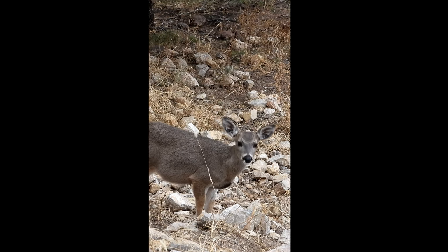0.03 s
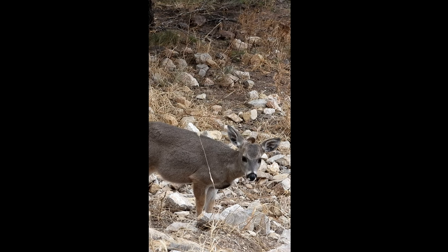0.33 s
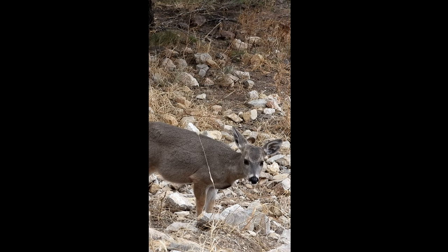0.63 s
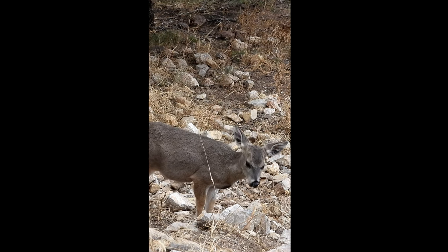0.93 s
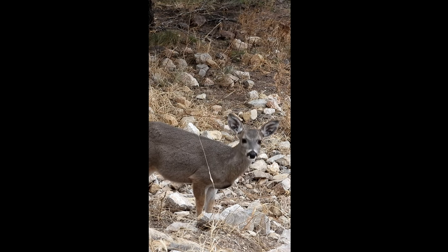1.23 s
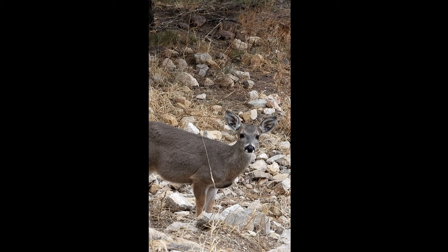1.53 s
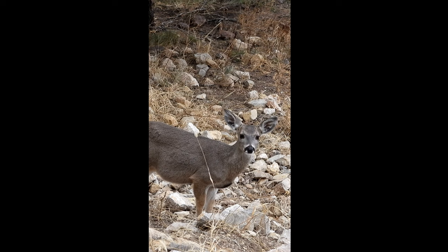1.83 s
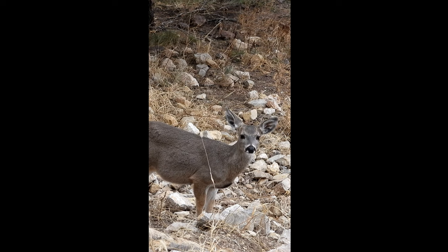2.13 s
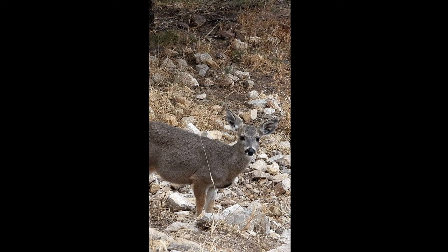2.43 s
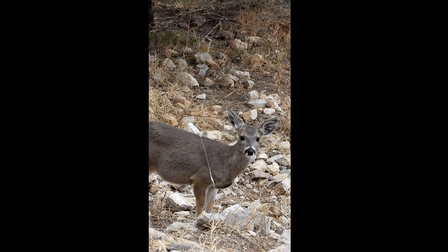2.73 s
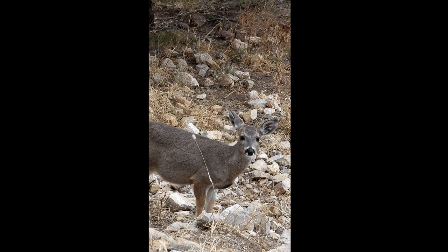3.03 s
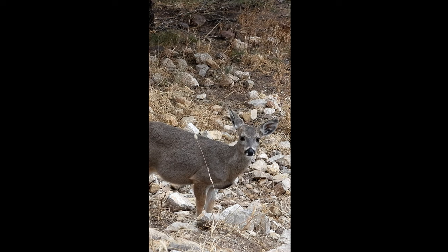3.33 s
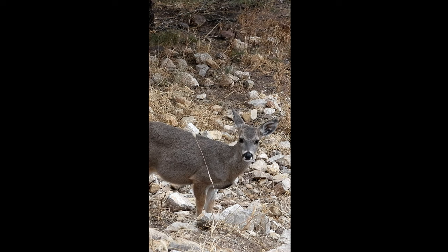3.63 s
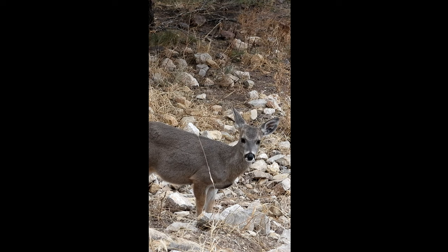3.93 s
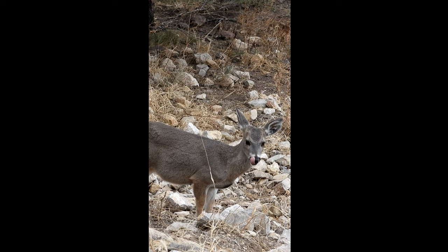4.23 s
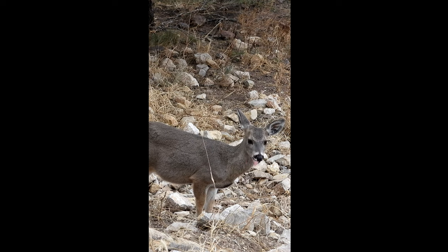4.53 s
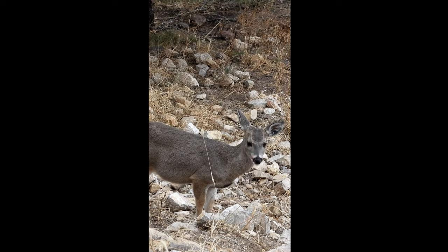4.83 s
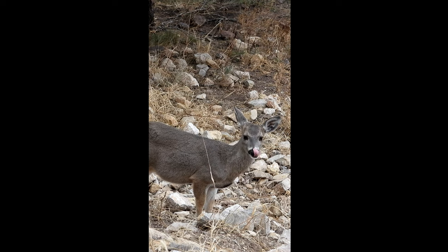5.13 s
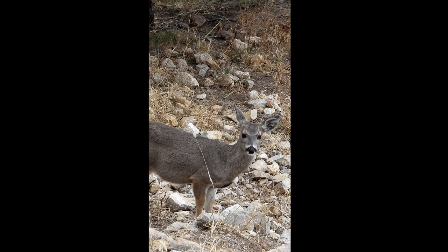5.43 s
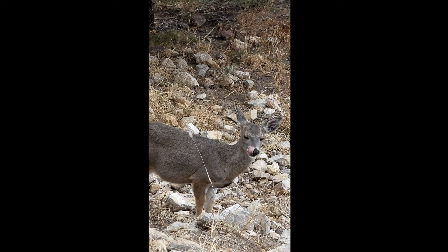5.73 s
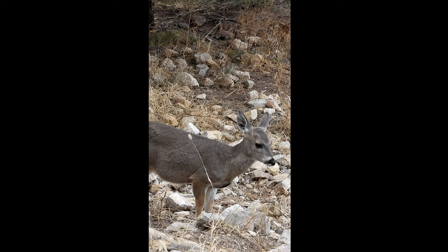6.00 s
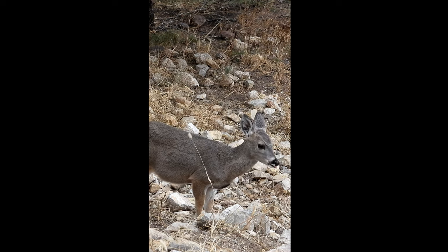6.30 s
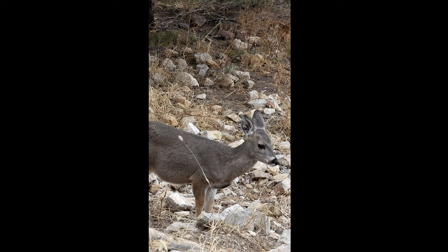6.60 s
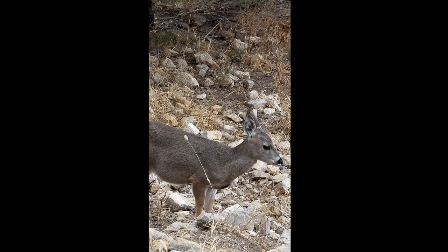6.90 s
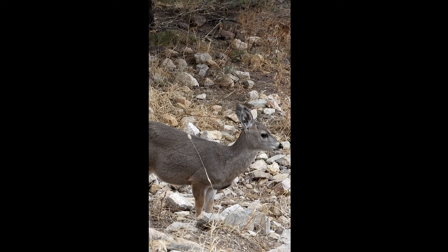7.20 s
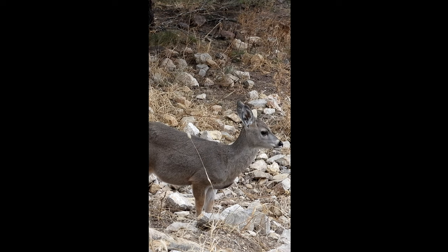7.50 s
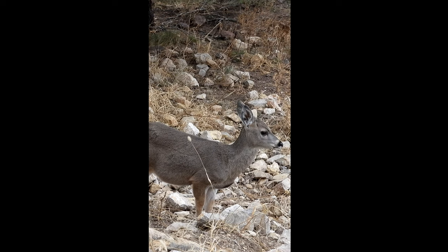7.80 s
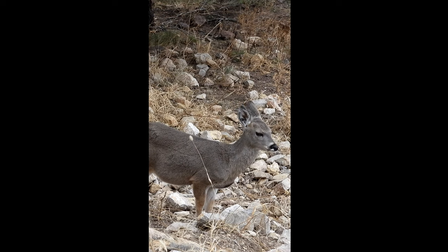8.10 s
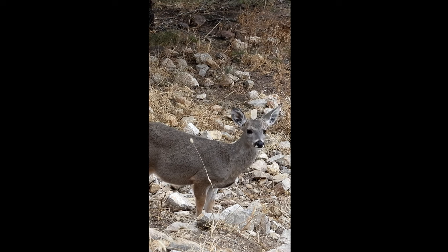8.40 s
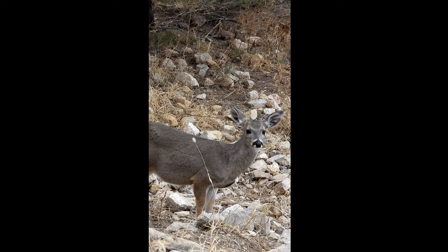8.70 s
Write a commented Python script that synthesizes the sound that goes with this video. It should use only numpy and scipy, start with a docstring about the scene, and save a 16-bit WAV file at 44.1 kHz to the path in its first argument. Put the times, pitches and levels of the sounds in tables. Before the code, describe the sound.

Steady wind rushes outdoors as a deer snorts once, loud and sudden, followed by faint handling thuds and tiny watery blips.

```python
"""Wind rushes steadily through dry brush on a stony slope, a faint thin whine and a few watery blips in it.
About a second in, a deer almost straight ahead of the stereo microphone sneezes: its nostrils splutter
open, a jet hisses through the nose and sinks into a hollower huff, and the rocks scatter it back.
The hand-held camera is bumped softly now and then, a twig ticks, and near the end comes a double sniff."""
import sys
import numpy as np
from scipy import signal
from scipy.fft import rfft, irfft
from scipy.io import wavfile

SR = 44100
rng = np.random.default_rng(int(sys.argv[2]) if len(sys.argv) > 2 else 0)


def transcribe(signal):
    """Save signal, clipped to [-1, 1], as a 16-bit WAV file at the path in sys.argv[1]."""
    frames = np.atleast_2d(signal).T
    limited = np.clip(frames, -1, 1)
    pcm = np.round(limited * 32767).astype(np.int16)
    wavfile.write(sys.argv[1], SR, pcm)


N = 394694
TIME = np.arange(N) / SR
BIN_HZ = np.arange(N // 2 + 1) * SR / N

# Resonances of the deer's narrow nasal passages. Each row: centre in Hz, width in Hz, gain in dB.
NASAL_MODES = [(1520, 330, -8), (2180, 230, -6), (2930, 125, 4), (3370, 140, 4), (3550, 160, 3),
               (3880, 98, 2), (4290, 120, 3), (4700, 230, 1.5), (5280, 110, 1), (5370, 82, -1),
               (5900, 330, -3), (6440, 170, -2), (7070, 180, -3.5), (8100, 600, -7.5), (10700, 1700, -7)]
# How alike the two microphones hear diffuse sound. Each row: frequency in Hz, correlation.
DIFFUSE_LIKENESS = [(100, .999), (300, 0.99), (640, 0.98), (1400, 0.97), (3100, 0.8), (6800, 0.64),
                    (15000, 0.42)]


def sneeze_and_sniffs(hiss_growth, flutter_db, flutter_hz):
    """Turbulent air rings the nose, then the throat; faster flow adds hiss, and wet nostrils flutter."""
    # Turbulence at the nostrils. Each row: frequency in Hz, relative level in dB.
    turbulence = [(60, -60), (160, -39), (400, -30), (800, -20), (1400, -13), (3000, -1.5), (7000, 2.5),
                  (11000, -1.5), (14000, -3), (15700, -1.5)]
    # How alike the two microphones hear the deer. Each row: frequency in Hz, correlation.
    likeness = [(300, .99), (1400, 1), (3100, 0.96), (7000, 0.86), (15000, .68)]
    # Resonances of the throat and open muzzle. Each row: centre in Hz, width in Hz, gain in dB.
    throat_modes = [(1400, 120, 1), (1950, 180, -1), (2220, 110, -3.5), (2510, 90, 1.5), (2760, 78, 2.5),
                    (3040, 120, -6), (3330, 94, -2), (6200, 1400, -14)]
    # One sneeze, two sniffs. Each row: time of full flow and hold in seconds, jet and huff levels
    # in dB, bare hiss in dB relative to the jet.
    puffs = [(1.120, 0.016, -12.1, -21.5, -3), (8.706, .008, -44.5, -57, -12), (8.744, .010, -41, -59, -12)]
    jet_rise, jet_fall = 1900, 470  # dB per second
    leak_s, leak_db, huff_lag_s = .020, -20, .019
    nose = unit_power(cavity(air_noise(turbulence, likeness), NASAL_MODES))
    throat = unit_power(cavity(air_noise(turbulence, likeness), throat_modes))
    hiss = air_noise(turbulence, likeness)
    air = 1e-18
    for s, hold_s, jet_db, huff_db, hiss_db in puffs:
        leak = leak_db + envelope_db(s - leak_s, leak_s, jet_rise, jet_fall)
        air += hiss * from_db(jet_db + leak)  # a thin hiss escapes ahead of the jet
        jet = envelope_db(s, hold_s, jet_rise, jet_fall)
        bare_hiss = hiss * from_db(hiss_db + hiss_growth * jet)
        air += (nose + bare_hiss) * from_db(jet_db + jet)
        huff = envelope_db(s + hold_s + huff_lag_s, 0, rise=480, fall=400)
        opening = envelope_db(s, hold_s, jet_rise, 0)  # no huff before the nostrils open
        air += throat * from_db(huff_db + huff + opening)
    return high_pass(air * from_db(flutter_db * drift(flutter_hz)), hz=190)


def splutter(gain_db):
    """Wet nostrils pop open, each pop knocking on the nasal resonances."""
    # Each row: time in seconds, relative level in dB.
    pops = [(1.1103, -2), (1.1123, -9), (1.1152, -10), (1.1220, 1), (1.1316, 0), (1.1437, -8),
            (1.1500, -10)]
    return from_db(gain_db) * cavity(clicks(pops), NASAL_MODES)


def rock_scatter(x, t60, dull_hz, first_s):
    """Countless stones on the slope return a thin, dull scatter that dies quickly."""
    t = TIME[:SR]
    echoes = rng.standard_normal((2, SR)) * from_db(-60 * t / t60) * (t > first_s)
    echoes = signal.sosfilt(signal.butter(2, dull_hz, fs=SR, output="sos"), echoes)
    echoes /= np.sqrt(np.sum(echoes ** 2, axis=1, keepdims=True))
    return signal.fftconvolve(x, echoes, axes=1)[:, :N]


def twig(gain_db):
    """A dry twig gives three tiny ticks."""
    # Each row: time in seconds, relative level in dB.
    ticks = [(4.2325, -29), (4.347, -32), (4.4473, -21.5)]
    ticking = resonate(clicks(ticks), hz=3700, width_hz=4600)
    return from_db(gain_db) * resonate(ticking, hz=4000, width_hz=6500)


def handling(bump_db, swell_cycles, scuff_db, scuff_s, rest_db, uneven_db):
    """Right at the microphone, the camera body thuds and scuffs over the uneven rumble of the grip."""
    # The hand bumps the camera. Each row: start in seconds, relative level in dB, pitch in Hz.
    bumps = [(1.365, -47, 233), (1.452, -58, 105), (1.608, -46, 205), (1.618, -55, 115), (1.685, -51, 190),
             (1.717, -44.5, 225), (1.838, -58, 130), (2.872, -61, 82), (3.99, -59, 160), (4.805, -56, 120),
             (5.853, -52, 200), (5.868, -54, 80), (6.55, -54, 130), (6.812, -55, 130), (7.102, -53, 190),
             (7.626, -54, 150), (7.888, -58, 170), (8.088, -59, 119), (8.46, -59, 130)]
    # The grip shifts. Each row: time of full strength in seconds, hold in seconds, level in dB.
    shifts = [(1.46, 0.21, -67), (3.26, .07, -82), (5.87, 1.1, -73.5), (8.15, .35, -71)]
    # Rumble of the hand rubbing. Each row: frequency in Hz, relative level in dB.
    rumble = [(25, -22), (45, -11), (80, 2), (150, -0.5), (250, -5), (500, -17), (1500, -70)]
    rubbing = sum(from_db(db + envelope_db(s, hold_s, rise=130, fall=40)) for s, hold_s, db in shifts)
    rubbing = (from_db(rest_db) + rubbing) * from_db(uneven_db * drift(12))
    thuds = 0
    for s, db, hz in bumps:
        cycles = np.clip((TIME - s) * hz, 0, 20)
        age = cycles / swell_cycles
        swell = age ** 2 * np.exp(2 * (1 - age))
        thuds += from_db(db + bump_db) * swell * np.sin(2 * np.pi * cycles)
        scuff = from_db(db + scuff_db) * np.exp(-((TIME - s) / scuff_s - 1) ** 2)
        rubbing = np.hypot(rubbing, scuff)
    return thuds + rubbing * air_noise(rumble, DIFFUSE_LIKENESS)


def wind(level_db, waver_db, waver_hz, freshen_db_per_s):
    """Wind in the brush all around: a broad rush that wavers slightly and slowly freshens."""
    # Each row: frequency in Hz, relative level in dB.
    rush = [(30, -45), (100, -30), (180, -22), (245, -17), (305, -7), (400, -10), (600, -6), (880, -1),
            (1900, 0.5), (3200, 0.2), (5000, -2.5), (8000, -3.5), (12000, -4), (15500, -6)]
    strength = from_db(level_db + waver_db * drift(waver_hz) + freshen_db_per_s * TIME)
    return strength * air_noise(rush, DIFFUSE_LIKENESS)


def whine(wander_hz, waver_db):
    """Thin, slightly unsteady tones come and go together behind the wind."""
    # Each row: pitch in Hz, relative level in dB.
    pitches = [(335, -14), (880, -6), (960, -9), (1040, -16), (1199, 1)]
    # Strength of the whole whine. Each row: time in seconds, gain in dB.
    strength = [(0, -71), (3.4, -72), (3.9, -64), (5.5, -69.5), (8.95, -61.5)]
    tones = 0
    for hz, db in pitches:
        gain = from_db(db + waver_db * drift(5))
        phase = 2 * np.pi * np.cumsum(hz + wander_hz * drift(10)) / SR
        tones += gain * unit_power(np.sin(phase))
    return from_db(np.interp(TIME, *np.transpose(strength))) * tones


def blips(width_hz, half_length_s):
    """Short watery gurgles, each around one pitch, barely above the wind."""
    # Each row: time of the peak in seconds, level in dB, pitch in Hz.
    gurgles = [(1.465, -54, 1630), (5.195, -48, 1900), (5.78, -50, 1900), (6.28, -46, 1820),
               (6.67, -51, 1850), (6.98, -48, 1500), (7.17, -48, 1900), (7.385, -48, 1830),
               (7.965, -52, 2150), (8.628, -49.5, 1380)]
    out, white = np.zeros(N), rng.standard_normal(N)
    for s, db, hz in gurgles:
        band = unit_power(resonate(resonate(white, hz, width_hz), hz, width_hz))
        out += from_db(db) * np.exp(-((TIME - s) / half_length_s) ** 2) * band
    return out


def cavity(x, modes):
    """The resonances of an air passage ring side by side and pass nothing deep."""
    ringing = sum((-1) ** k * from_db(db) * resonate(x, hz, width)
                  for k, (hz, width, db) in enumerate(modes))
    return high_pass(ringing, hz=1100)


def air_noise(spectrum, likeness):
    """Coloured noise at two microphones, less alike towards the treble."""
    mid, side = rfft(rng.standard_normal((2, N))) * from_db(per_bin(spectrum))
    alike = np.clip(per_bin(likeness), 0, 1)
    pair = np.sqrt(1 + alike) * mid + np.sqrt(1 - alike) * side * [[1], [-1]]
    return unit_power(irfft(pair, N))


def resonate(x, hz, width_hz):
    """One resonance with gain 1 at its peak."""
    r = np.exp(-np.pi * width_hz / SR)
    feedback = [1, -2 * r * np.cos(2 * np.pi * hz / SR), r * r]
    return signal.lfilter(np.array([1, 0, -1]) * (1 - r * r) / 2, feedback, x + 1e-18)


def high_pass(x, hz):
    """Roll off the bass below hz."""
    return signal.sosfilt(signal.butter(2, hz, "high", fs=SR, output="sos"), x)


def envelope_db(s, hold_s, rise, fall):
    """Rise to 0 dB at time s, hold, then fall; both slopes in dB per second."""
    return -rise * np.maximum(s - TIME, 0) - fall * np.maximum(TIME - s - hold_s, 0)


def clicks(rows):
    """One impulse for each row of seconds and dB."""
    out = np.zeros(N)
    for s, db in rows:
        out[round(s * SR)] += from_db(db)
    return out


def drift(rate_hz):
    """Smooth random wander with spread 1."""
    return unit_power(irfft(rfft(rng.standard_normal(N)) / (1 + (BIN_HZ / rate_hz) ** 2), N))


def per_bin(curve):
    """Read a curve at every frequency bin, on a log-frequency axis."""
    hz, values = np.transpose(curve)
    return np.interp(np.log(BIN_HZ + 1), np.log(hz), values)


def from_db(db):
    """Decibels to gain."""
    return 10 ** (np.asarray(db) / 20)


def unit_power(x):
    """Scale to an RMS of 1."""
    return x / np.sqrt(np.mean(x ** 2) + 1e-20)


def scene():
    """The deer stands almost straight ahead; sound reaches the left microphone a moment earlier."""
    deer = sneeze_and_sniffs(hiss_growth=0.01, flutter_db=0.4, flutter_hz=400) + splutter(gain_db=10.5)
    near_rocks = from_db(-25) * rock_scatter(deer, t60=0.29, dull_hz=5500, first_s=.02)
    far_rocks = from_db(-35) * rock_scatter(deer, t60=.8, dull_hz=4500, first_s=0.045)
    out = deer + near_rocks + far_rocks
    out += wind(level_db=-40.5, waver_db=0.52, waver_hz=11, freshen_db_per_s=.05)
    out += whine(wander_hz=4, waver_db=2.5) + blips(width_hz=290, half_length_s=0.017)
    out += handling(bump_db=-1.5, swell_cycles=0.8, scuff_db=-13, scuff_s=0.017, rest_db=-88, uneven_db=2)
    left, right = out + twig(gain_db=11)
    right_lag_s = 2.2e-5
    return np.array([left, irfft(rfft(right) * np.exp(-2j * np.pi * BIN_HZ * right_lag_s), N)])


def record(dry):
    """The camera clips the highest peaks and cuts the treble above 15.7 kHz."""
    treble_cut = signal.ellip(12, .1, 80, 15700, fs=SR, output="sos")
    return signal.sosfilt(treble_cut, np.clip(dry, -1, 1))


dry = scene()
out = record(dry)
transcribe(out)
```